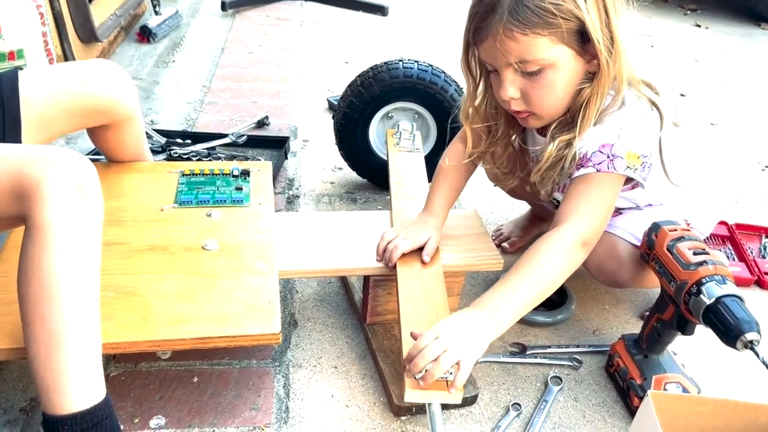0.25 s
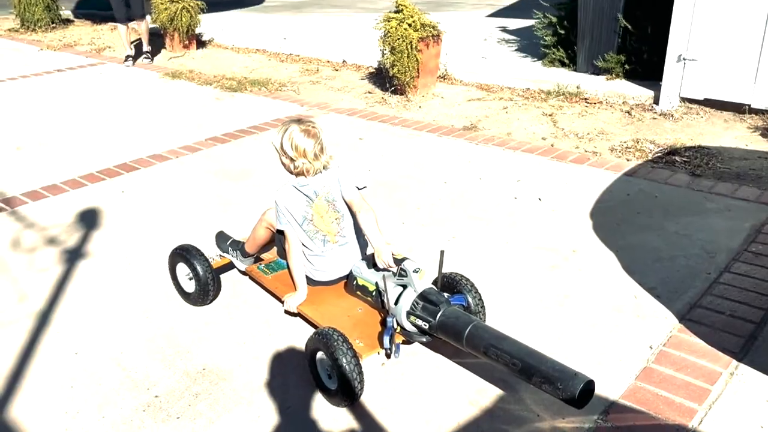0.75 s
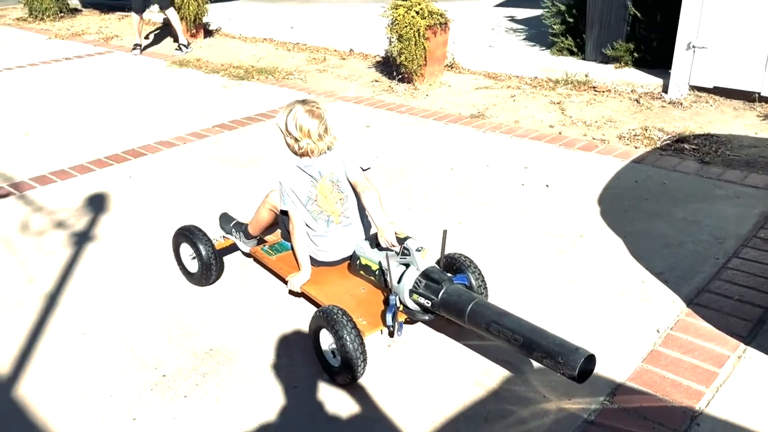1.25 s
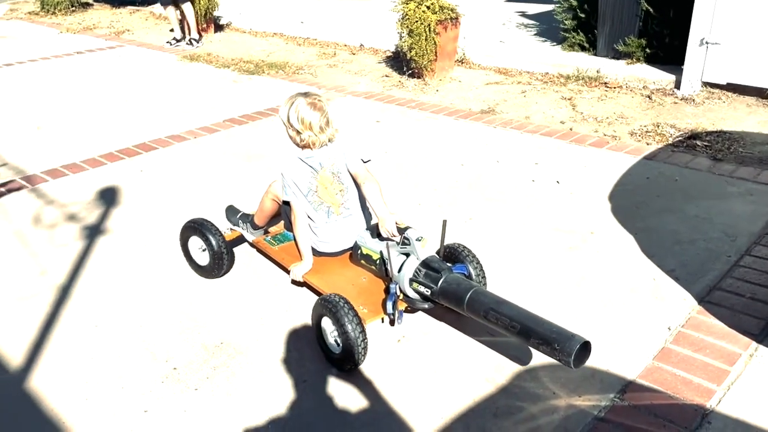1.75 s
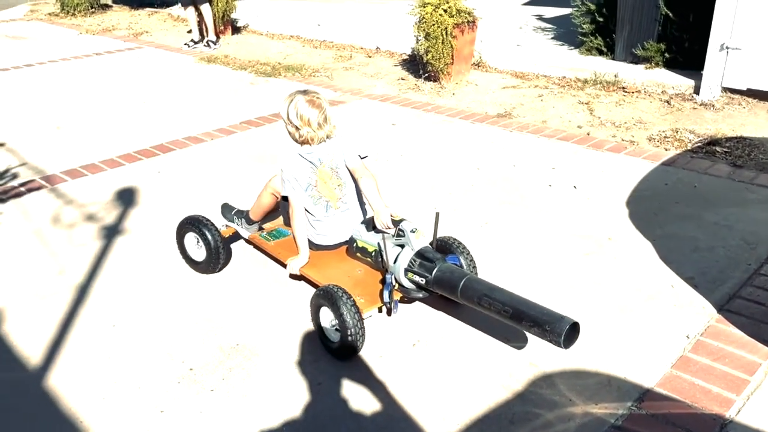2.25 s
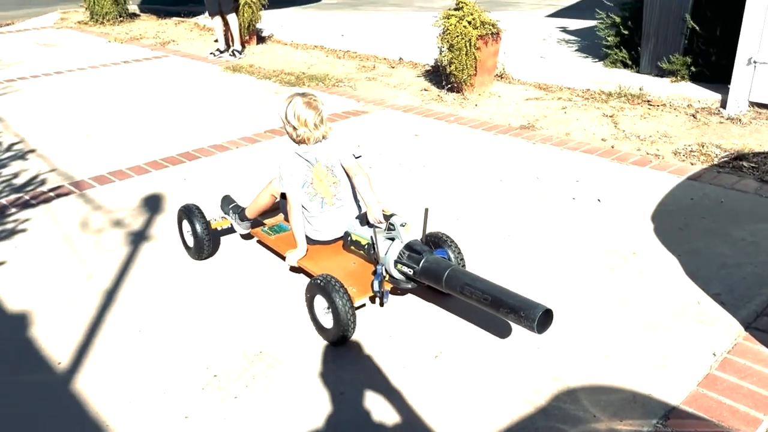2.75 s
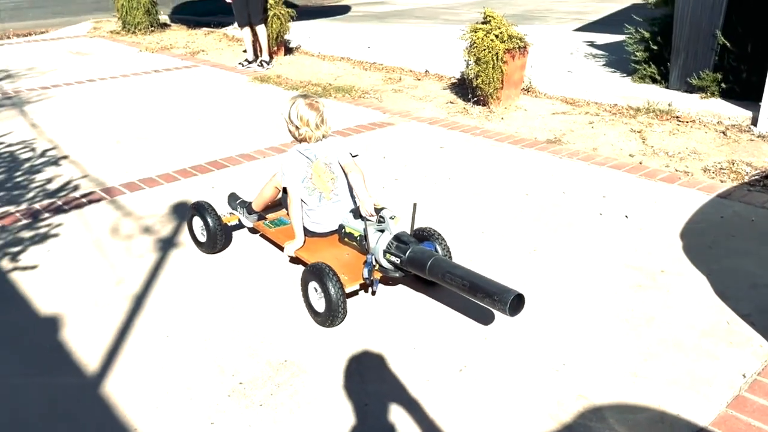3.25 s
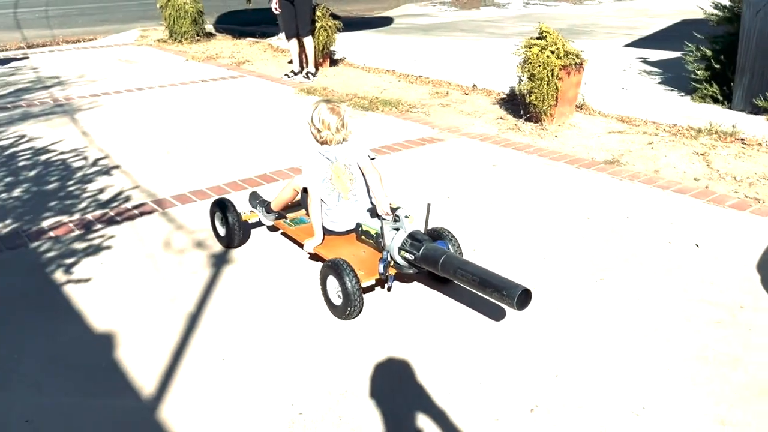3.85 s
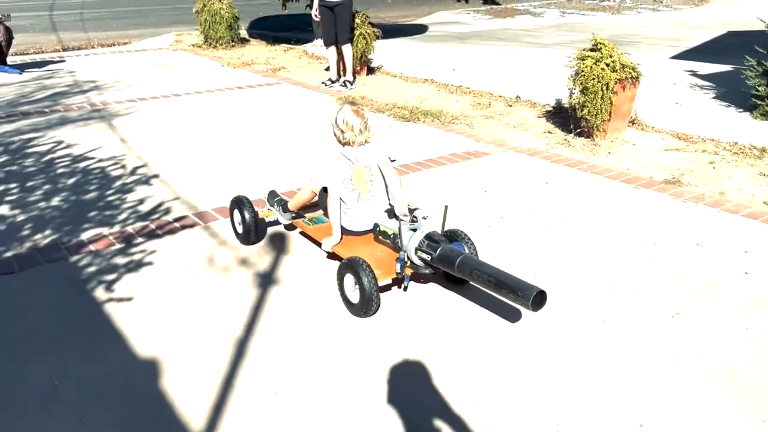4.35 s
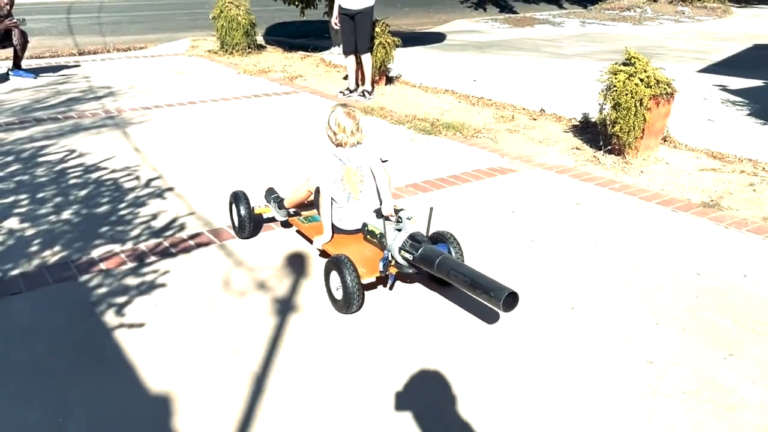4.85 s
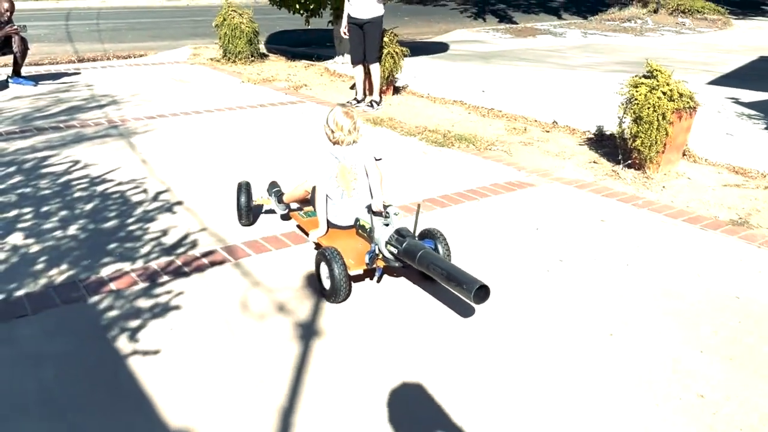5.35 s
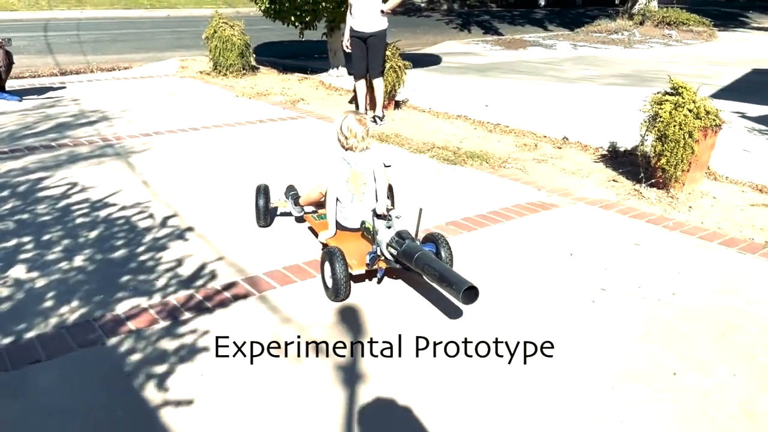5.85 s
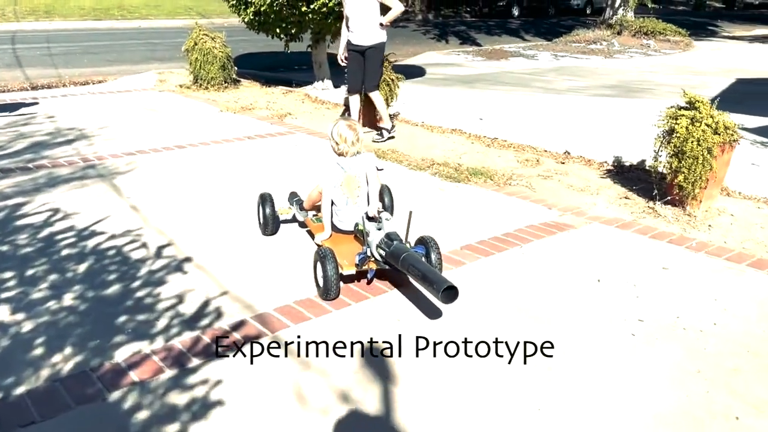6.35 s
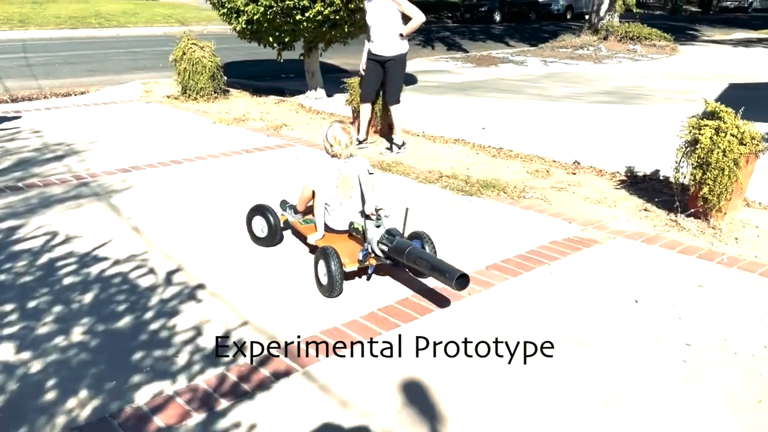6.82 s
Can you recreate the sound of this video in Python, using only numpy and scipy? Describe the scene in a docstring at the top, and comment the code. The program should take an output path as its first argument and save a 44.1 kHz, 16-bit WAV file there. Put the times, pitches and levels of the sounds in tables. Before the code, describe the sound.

A battery leaf blower on a homemade cart clicks on, whines rapidly up to speed, then blows a steady loud rush of air outdoors.

```python
"""Leaf blower starting up in a paved yard

A battery leaf blower on a cart is switched on with small ticks, spins up and runs at full speed. Noise shaped
by frequency makes its rushing air; sine waves tied to the shaft make its hum and whine. Traffic rumbles and an
engine idles far off; this background drops sharply at about 0.47 s, and a few dull wheel bumps follow. Two
microphone ports hear it all, alike at some pitches and different at others."""
import sys
import numpy as np
from scipy import signal
from scipy.fft import rfft, irfft, next_fast_len
from scipy.io import wavfile

SR = 44100
rng = np.random.default_rng(int(sys.argv[2]) if len(sys.argv) > 2 else 0)


def to_wav(sig):
    """Store sig (one row per channel, or 1-D mono) as 16-bit WAV at the path in sys.argv[1].

    Samples outside -1..1 are clipped; the rate is SR.
    """
    pcm = np.clip(np.atleast_2d(sig), -1, 1) * 32767
    pcm = np.round(pcm).astype(np.int16)
    wavfile.write(sys.argv[1], SR, pcm.T)  # frames by channels


N = 312518   # length in samples
SIZE = next_fast_len(N + SR // 4)   # padded length for filtering
HZ = np.maximum(np.fft.rfftfreq(SIZE, 1 / SR), 1)
TIME_S = np.arange(N) / SR


def from_db(db):
    """Turn decibels into a gain."""
    return 10 ** (np.asarray(db) / 20)


def rms_one(x):
    """Scale a signal to an average power of one."""
    return x / np.sqrt(np.mean(x ** 2) + 1e-20)


def in_time(rows):
    """Join the points of a time table into curves, one value per sample."""
    s, *columns = np.transpose(rows)
    return [np.interp(TIME_S, s, column) for column in columns]


def over_hz(points):
    """Read a (frequency, value) table at every frequency, with straight lines on a log pitch scale."""
    hz, value = np.transpose(points)
    return np.interp(np.log(HZ), np.log(np.maximum(hz, 1)), value)


def through(x, gain):
    """Filter a sound by multiplying each frequency by its gain."""
    return irfft(rfft(x, SIZE) * gain, SIZE)[..., :N]


def coloured(gain):
    """Shape two unrelated white noises by a gain at each frequency, then set their power to one."""
    return rms_one(through(rng.standard_normal((2, SIZE)), gain))


def resonant(modes):
    """Add the powers of resonances, each a peak in gain with its own pitch, width and level."""
    power = sum(from_db(db) ** 2 / (1 + (2 * (HZ - hz) / width) ** 2) ** 2 for hz, width, db in modes)
    return np.sqrt(power)


def drift(rate_hz):
    """Smooth noise into two slow random curves of spread one; a higher rate wanders faster."""
    r = np.exp(-80 * np.pi * rate_hz / SR)
    noise = rng.standard_normal((2, N // 40 + 2002))   # one value per 40 samples
    slow = signal.lfilter([1], [1, -2 * r, r * r], noise)[:, 2000:]   # leave out the filter's start
    return np.array([np.interp(np.arange(N) / 40, np.arange(len(v)), rms_one(v)) for v in slow])


def swell(s, db, t60_s, rise_s):
    """Rise quickly to a peak, then die away by 60 dB in t60_s."""
    decay = (TIME_S - s) / t60_s
    rise = (s - TIME_S) / rise_s
    return from_db(db - 60 * np.where(TIME_S > s, decay, rise))


TURN_S = 0.16   # how quickly a part swings toward the microphone or away


def facing(rest_db, spells):
    """Gain of a part that swings toward the microphone for some spells, adding power to its rest level."""
    t = np.linspace(0, N / SR, num=1000)
    power = np.full(len(t), from_db(rest_db) ** 2)
    for start, end, db in spells:
        swing = (np.tanh((t - start) / TURN_S) - np.tanh((t - end) / TURN_S)) / 2
        power = power + from_db(db) ** 2 * swing
    return np.interp(TIME_S, t, np.sqrt(power))


# Tone colour of low rumble: pitch_hz, level_db per Hz
RUMBLE_COLOUR = [(15, -44), (25, -78), (48, 0.5), (129, 1.5), (182, -5), (202, -7), (525, -15), (703, -5),
                 (868, -10), (1600, -12.5), (14000, -47.5)]
RUMBLE_DB, RUMBLE_LATER_DB, DROP_S = -47, -54.5, 0.466
# Parts of the far engine's throb: multiple of the firing rate, level_db
IDLE_PARTS = [(2, -1), (3, 0.5), (4, -4), (6, -10), (8, -13.5)]
IDLE_HZ = 28.9   # firing rate
# Level of the throb before the drop: time_s, level_db
IDLE_LEVEL = [(0, -48), (.05, -53), (.15, -58), (.19, -47), (.27, -46), (.37, -52), (.43, -48)]


def yard():
    """Far traffic as low noise, and an idling engine as sines on its firing rate; the background drops sharply
    at DROP_S."""
    dropped = np.interp(TIME_S, [DROP_S - .02, DROP_S + .02], [0, 1])
    phase = 2 * np.pi * IDLE_HZ * TIME_S + .3 * drift(6)[0]
    throb = sum(from_db(db + 2.6 * drift(8)[0]) * np.sin(multiple * phase) for multiple, db in IDLE_PARTS)
    rumble_db = RUMBLE_DB + (RUMBLE_LATER_DB - RUMBLE_DB) * dropped
    rumble = from_db(rumble_db) * coloured(from_db(over_hz(RUMBLE_COLOUR)))
    return rumble + from_db(in_time(IDLE_LEVEL)[0] - 60 * dropped) * throb


# Ticks of the switch and small parts: time_s, level_db, t60_s
TICKS = [(0.148, -45.5, 0.05), (.234, -55, .03), (0.285, -44, 0.041)]
# Resonances that colour the ticks: pitch_hz, width_hz, level_db
TICK_MODES = [(2930, 740, 8), (4400, 400, 3), (5300, 620, 1), (6500, 560, -1), (9600, 1100, -8)]


def ticks():
    """Bright, short bursts of noise from the switch and small parts, the same in both paths."""
    bursts = sum(swell(s, db, t60, rise_s=0.021) for s, db, t60 in TICKS)
    broad = 0.16 / (1 + (HZ / 9000) ** 4)   # a broad base under the resonances
    return bursts * coloured(resonant(TICK_MODES) + broad)[0]


# Wheel bumps: time_s, peak_db, pitch_hz, t60_s
BUMPS = [(3.13, -35, 225, 0.11), (4.06, -37, 254, .08), (6.65, -30, 107.4, .12)]


def wheel_bumps():
    """Dull bumps of a wheel, each a sine that swells and dies away."""
    return sum(swell(s, db, t60, rise_s=0.08) * np.sin(2 * np.pi * hz * TIME_S)
               for s, db, hz, t60 in BUMPS)


BUFFET_FLICKER_DB = 1.5
# Low buffeting of the jet: rest_db, then spells of start_s, end_s, added level_db (relative to the blower)
BUFFET_FACES = (-22, [(.9, 1.6, -22), (5.85, 6.6, -22)])


def buffeting():
    """Low, slowly flickering noise of the jet, louder in spells."""
    flicker = from_db(BUFFET_FLICKER_DB * drift(2.6)[0])
    return facing(*BUFFET_FACES) * flicker * coloured(from_db(over_hz(RUMBLE_COLOUR)))


# The low roar's resonance: pitch_hz, width_hz, level_db
ROAR = [(556, 190, 0)]
ROAR_START_DB, ROAR_DB_PER_S = -29, 1.65


def roar():
    """The low roar of the jet, noise in one wide resonance that grows steadily."""
    return from_db(ROAR_START_DB + ROAR_DB_PER_S * TIME_S) * coloured(resonant(ROAR))


# Narrow resonances in the air noise: pitch_hz, width_hz, level_db
STREAKS = [(245.4, 95, -5.5), (755, 55, -2), (1495, 37, 4.5), (1308, 50, -3.5), (2043, 26, -9),
           (2157, 22, 6), (2545, 40, -4.5), (3267, 67, 0.5), (3910, 48, -5.5), (3018, 110, -1.5),
           (5200, 49, -19)]
STREAKS_START_DB, STREAKS_DB_PER_S = -4.5, -1.37


def streaky_air():
    """Air noise in narrow resonances, fading steadily."""
    return from_db(STREAKS_START_DB + STREAKS_DB_PER_S * TIME_S) * coloured(resonant(STREAKS))


# Humps beamed out by housing and nozzle: pitch_hz, width_hz, rest_db, spells of start_s, end_s, added level_db
NOZZLE = [(1084, 230, -21.5, [(.1, 2.02, -13), (5.3, 6.75, -14)]), (1398, 230, -38, [(1.0, 2.9, -10),
          (2.9, 5.5, -9.5), (5.5, 7.3, -12)]), (1692, 59, -37, [(.95, 1.6, -7.5), (1.6, 3.5, -9.5)]),
          (1523, 91, -38, [(4.13, 5.2, -8)]), (3800, 210, -44, [(2.3, 3.4, -18)]),
          (2240, 440, -48, [(.6, 1.0, -11), (2.9, 3.5, -9), (3.5, 5.5, -7), (5.5, 6.95, -5.5)]),
          (3700, 1300, -29, [(.65, 1.7, -11.5), (1.7, 3.5, -12.5), (3.5, 5.1, -8), (6.7, 7.3, -8)]),
          (3370, 220, -39, [(.62, 1.2, -10), (2.4, 5.1, -20), (5.6, 6.4, -18.5)]),
          (5700, 1400, -37, [(.1, 1.9, -14), (5.45, 12, -14)])]


def nozzle():
    """Noise in separate resonances, each swelling as it points this way, with one shared flicker."""
    flicker = from_db(0.81 * drift(46)[0])
    return flicker * sum(facing(rest_db, spells) * coloured(resonant([(hz, width, 0)]))
                         for hz, width, rest_db, spells in NOZZLE)


# Tone colour of the rush: pitch_hz, level_db per Hz
RUSH_COLOUR = [(35, -45), (60, -13), (236, -7.5), (346, -10.5), (382, -11.5), (490, -11), (610, -6),
               (749, -6.5), (1680, 0.5), (2430, -2), (2900, -0.5), (3400, -10.5), (4670, -11), (6000, -17),
               (7800, -45), (13200, -120)]
# Tone colour of the hiss: pitch_hz, level_db per Hz
HISS_COLOUR = [(1500, -30), (3500, -2), (4400, -1), (5000, -3.5), (5800, -1), (7000, -1.5), (9000, -1.5),
               (11000, -5), (13000, -8), (16000, -9.5)]
# How the hiss faces us: rest_db, then spells of start_s, end_s, added level_db
HISS_FACES = (0.26, [(5.4, 6.6, -0.5)])
HISS_POWER = 1   # extra growth of the hiss with speed


def rush_and_hiss(pace):
    """Wide noise of rushing air and a brighter hiss, sharing gusts but flickering separately."""
    gust_db = 0.31 * drift(13.0)[0]
    rush_gain = from_db(-4.5 + gust_db + 1.55 * drift(11.5)[0])
    hiss_gain = facing(*HISS_FACES) * pace ** HISS_POWER * from_db(gust_db + 0.67 * drift(29)[0])
    rush = rush_gain * coloured(from_db(over_hz(RUSH_COLOUR)))
    return rush + hiss_gain * coloured(from_db(over_hz(HISS_COLOUR)))


# Delay of the copy off the paving: time_s, lag_s
BOUNCE_LAG = [(0, .00106), (2.4, .00106), (3.1, .00094), (3.6, .00089), (6, .00086), (7.09, .00086)]
BOUNCE_SHARE, BOUNCE_PER_S = 0.19, 0.018   # starting gain and its growth as the cart rolls off
ECHO_CUT_HZ = 4000   # above this the copy grows duller


def paving_bounce(air):
    """A delayed, duller copy off the paving, sooner and stronger as the cart rolls off."""
    late_s = TIME_S - in_time(BOUNCE_LAG)[0]
    dull = through(air, 1 / (1 + (HZ / ECHO_CUT_HZ) ** 2))
    copy = np.array([np.interp(late_s, TIME_S, path) for path in dull])
    return (BOUNCE_SHARE + BOUNCE_PER_S * TIME_S) * copy


# Bands that sink as the cart turns: pitch_hz, width_hz, start_s, end_s, share taken out in db
HOLLOWS = [(2380, 150, 2.1, 2.64, -7), (2680, 170, 3, 5.5, -6), (2940, 180, 5.6, 6.9, -5),
           (1834, 220, 4.14, 5.0, -7), (622, 280, 1.5, 3.0, -9)]


def hollows(air):
    """The part of the air sound to take out, band by band, as the cart turns."""
    return sum(facing(-43, [spell]) * through(air, resonant([(hz, width, 0)]))
               for hz, width, *spell in HOLLOWS)


# Speed of the shaft: time_s, turns_hz
SHAFT = [(.2, 10), (.33, 51), (.385, 66.5), (.41, 75), (.47, 100), (.5, 111.5), (.6, 152), (.68, 186),
         (.73, 210), (.82, 253), (.88, 279), (.91, 301), (1.0, 356), (1.03, 371), (1.06, 379),
         (1.15, 383.5), (1.65, 381.7), (1.8, 386), (2.8, 384), (4.4, 382), (4.48, 386), (7.09, 382.7)]


def tones(orders, wobble_rad, flutter_hz):
    """Sines locked to the shaft; turbulence makes their level and phase flutter."""
    speed = in_time(SHAFT)[0]
    turns = np.cumsum(speed) / SR
    out = 0
    for multiple, db, flutter_db, power, *spells in orders:
        shake = .9 * drift(flutter_hz) + .35 * drift(flutter_hz / 8)   # quick flutter on slow swells
        start_phase = rng.uniform(0, 2 * np.pi, (2, 1))
        phase = 2 * np.pi * multiple * turns + wobble_rad * shake[::-1] + start_phase
        level = facing(db, spells) * from_db(flutter_db * shake) * (speed / speed[-1]) ** power
        out = out + level * np.sin(phase)
    return out * np.sqrt(2)


# The rotor's tone: multiple of shaft speed, level_db, flutter_db, power of speed its size follows
UNBALANCE = [(1, 0, 1.5, 0)]
# Loudness of the hum: rest_db, then spells of start_s, end_s, added level_db (relative to the blower)
HUM_FACES = (-35, [(0.7, 2.5, -23.5), (4.1, 4.7, -27), (5.7, 6.25, -25.5)])
# Resonance of the frame: shaft speed_hz, width_hz, boost_db
FRAME = (263, 103, 17)


def rotor_hum():
    """A hum once per turn, boosted when the shaft passes the frame's resonance."""
    hz, width, db = FRAME
    speed = in_time(SHAFT)[0]
    shaking = 1 + from_db(db) / (1 + (2 * (speed - hz) / width) ** 2) ** 2
    return shaking * facing(*HUM_FACES) * tones(UNBALANCE, .2, 5)


# Fan tones: multiple of shaft speed, rest_db (relative to the blower), flutter_db, extra power of speed,
# then spells of start_s, end_s, added level_db
FAN = [(2, -40, 3, 3, (1.2, 2.9, -27)), (3, -27, 2.5, 2, (.78, 1.1, -9), (1.1, 1.6, -13), (1.6, 3.1, -15),
       (3.4, 4.3, -20), (5.2, 7.3, -13)), (6, -34, 4, 6, (3.1, 5.4, -17), (5.4, 7.3, -18)),
       (9, -28, 3, 4, (2.15, 3.9, -14.5), (4.1, 4.8, -17), (5.2, 6.7, -17)),
       (18, -25, 3, 12, (.95, 2.5, -17), (4.7, 6.7, -18)), (24, -19, 3, 8, (.85, 1.5, -13), (2.7, 3.2, -16),
       (3.7, 7.3, -16)), (27, -28, 4, 12, (2.2, 3.4, -23), (4.6, 7.3, -20)), (36, -27, 3, 12)]


def fan_tones():
    """Tones on multiples of the shaft speed, louder in spells."""
    return tones(FAN, .45, 24)


# Start-up tones, among them a rough one at 8.5 times shaft speed:
# multiple of shaft speed, level_db, flutter_db, power of speed
START_UP = [(8.5, -22, 2, -2), (12, -7, 3, 0), (15, -8, 3, 0), (18, -11, 5, 0), (20, -11, 5, 0),
            (30, 0, 2.5, 0), (45, -38, 4, -2), (60, -39, 4, -2)]
# Level of the start-up tones: time_s, level_db
START_UP_LEVEL = [(.2, -100), (.3, -64), (.35, -51), (.43, -54), (.5, -44), (.56, -45), (.61, -48),
                  (.67, -44), (.74, -58), (.9, -90)]
# How well the casing passes each pitch: pitch_hz, gain_db
CASING = [(600, -36), (800, -12), (900, -14), (970, -3), (1030, -3), (1100, 8), (1160, 1), (1220, 4),
          (1350, -8), (1500, -5), (1750, 4), (2200, -16), (2650, -7), (2950, 0), (3100, -5), (3350, 3),
          (3550, -6), (3800, 0), (4000, -2), (4300, 3), (4700, -6), (4900, -8), (5200, -3), (5700, -5),
          (6300, -35)]


def start_up_whine():
    """Tones that climb with the shaft as it pulls up to speed, coloured by the casing."""
    whine = from_db(in_time(START_UP_LEVEL)[0]) * tones(START_UP, .7, 30)
    return through(whine, from_db(over_hz(CASING)))


# The blade-passing tone: multiple of shaft speed, level_db, flutter_db, power of speed
BLADES = [(12, -.5, 3.5, 0)]
# How the blade whine swells and sinks: time_s, level_db
BLADE_LEVEL = [(.68, -64), (.735, -39), (.76, -41), (.8, -38), (.82, -36), (.87, -31), (.895, -38),
               (.92, -32), (.94, -38), (.955, -33), (.975, -36), (1.0, -25), (1.017, -34), (1.035, -27),
               (1.075, -35), (1.16, -32), (1.4, -36), (1.7, -48), (1.86, -36), (2.1, -45), (2.3, -38),
               (2.55, -50), (2.79, -50), (2.85, -40), (3.0, -44), (3.16, -37), (3.26, -43), (3.4, -36),
               (3.6, -41), (3.9, -41), (4.15, -42), (4.36, -45), (4.5, -34), (4.6, -44), (4.72, -38),
               (5.0, -39), (5.3, -44), (5.6, -39), (5.8, -36), (5.97, -41), (6.19, -33), (6.42, -41),
               (6.7, -36), (6.85, -35), (6.94, -42), (7.05, -33)]


def blade_whine():
    """The whine of passing blades, a sine at twelve times the shaft speed that swells and sinks."""
    return from_db(in_time(BLADE_LEVEL)[0]) * tones(BLADES, .7, 26)


FULL_HZ = 384   # full shaft speed
BLOWER_DB, BLOWER_POWER = -25, 1.94   # base level, and power of the speed that the blower's size follows
# Loudest just after the start, then a drop and a creep back: time_s, level_db added to the base
HEARD = [(1.05, 0.6), (1.24, -0.5), (1.36, -2), (1.45, -2), (1.6, -7.5), (2.11, -7.5), (2.92, -5),
         (4.36, -6), (4.51, -4), (5.4, -4.5), (6.0, -4.5), (7.08, -4)]


def blower():
    """Air, fan tones and hum grow with shaft speed; the start-up and blade whines keep their own levels."""
    pace = in_time(SHAFT)[0] / FULL_HZ
    air = rush_and_hiss(pace) + streaky_air() + nozzle() + roar()
    air += paving_bounce(air)
    air -= hollows(air)
    air += buffeting()
    level = from_db(BLOWER_DB + in_time(HEARD)[0]) * pace ** BLOWER_POWER
    return level * (air + fan_tones() + rotor_hum()) + start_up_whine() + blade_whine()


def scene():
    """Add all sources, as two paths that share only the ticks, the wheel bumps and the engine throb."""
    return yard() + ticks() + wheel_bumps() + blower()


# Likeness of the two ports: pitch_hz, share common to both
LIKENESS = [(60, 0.96), (200, 1), (500, 0.58), (1200, 0.89), (1800, 0.71), (2800, 0.9), (4500, 0.76),
            (6000, 0.13), (8000, 1), (10000, 0.45), (11600, 1), (13000, 0.57), (14500, 1)]
# Phase by which the left port leads: pitch_hz, lead_radians
LEAD = [(0, 0), (400, -.2), (520, -.6), (1100, -.2), (1700, -.7), (2600, .1), (4300, .05), (4900, .4),
        (5500, -.9), (6500, -1), (7700, -2.6), (8100, -3.14), (8800, -3.5), (11000, -6.2), (12200, -6.3),
        (14300, -9.4), (16000, -9.5)]
# Left level above right: pitch_hz, difference_db
TILT = [(60, -1), (110, 0.5), (200, 0.5), (380, 0), (700, -2), (1290, -1.5), (2380, -1), (4400, 2.5),
        (8120, 0.5), (15000, -1)]
CUTOFF_HZ = 15700


def record(dry):
    """Mix two paths into two ports by pitch, set their phase and level apart, and cut the top."""
    one, other = rfft(dry, SIZE)
    alike = np.clip(over_hz(LIKENESS), 0, 1)
    common = np.sqrt((1 + alike) / 2) * one
    apart = np.sqrt((1 - alike) / 2) * other
    hz, radians = np.transpose(LEAD)
    # Each port takes half of the phase and level difference
    half = from_db(over_hz(TILT) / 2) * np.exp(.5j * np.interp(HZ, hz, radians))
    ports = irfft(np.array([(common + apart) * half, (common - apart) / half]), SIZE)[:, :N]
    top_cut = signal.ellip(14, .3, 75, CUTOFF_HZ + 50, fs=SR, output="sos")
    return signal.sosfilt(top_cut, ports)


dry = scene()
out = record(dry)
to_wav(out)
```